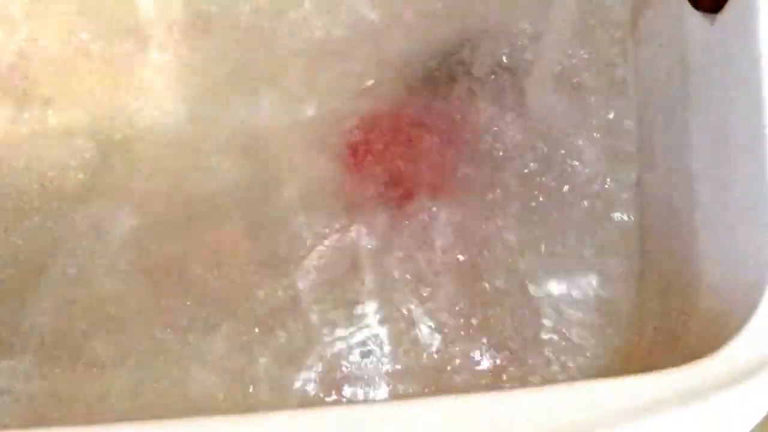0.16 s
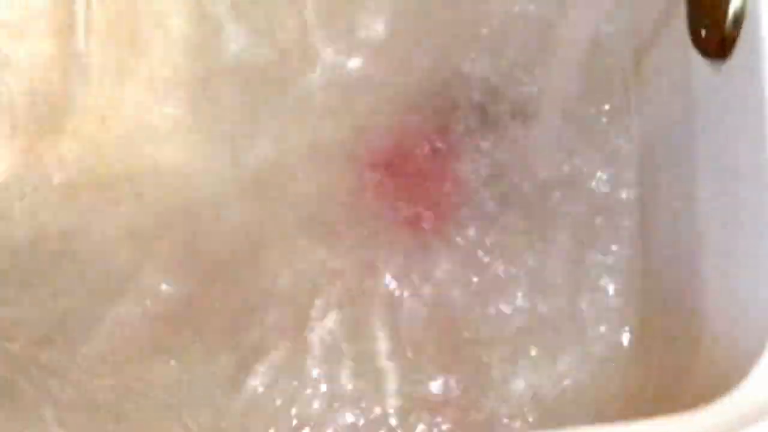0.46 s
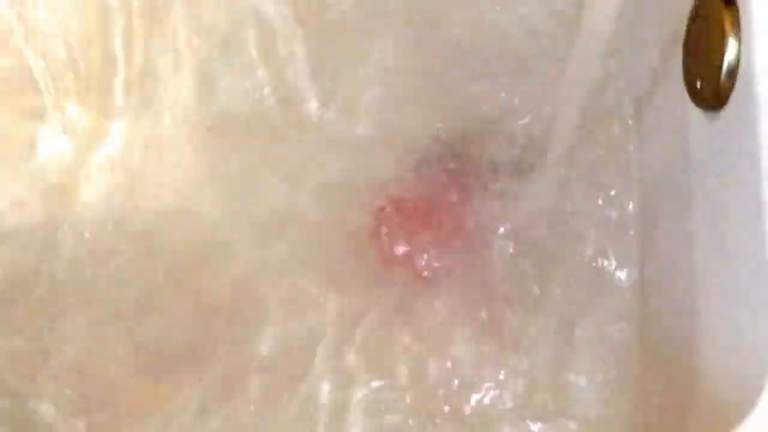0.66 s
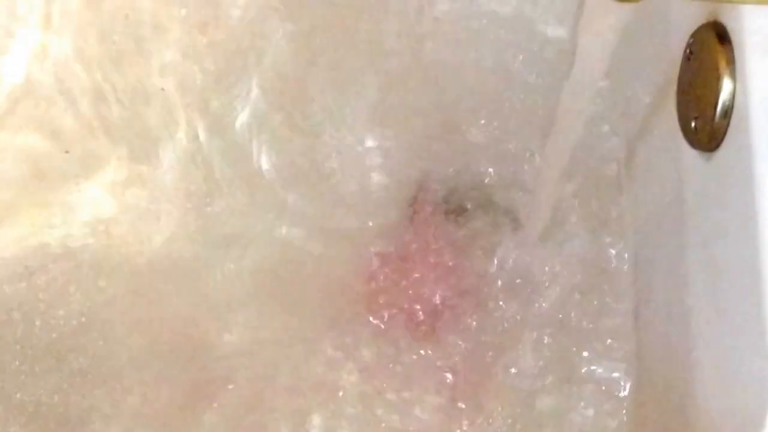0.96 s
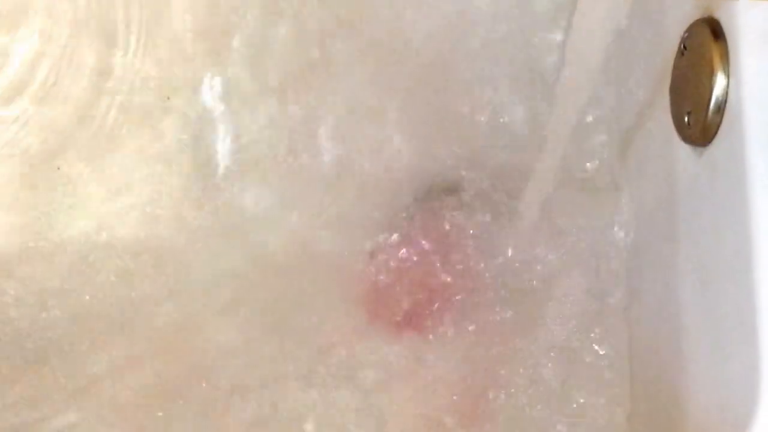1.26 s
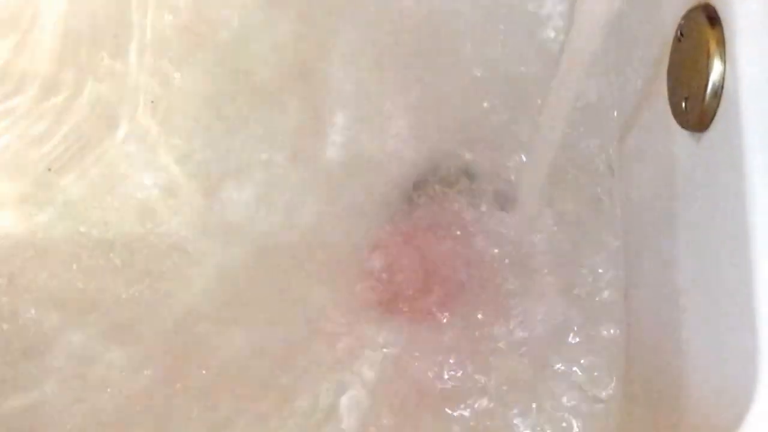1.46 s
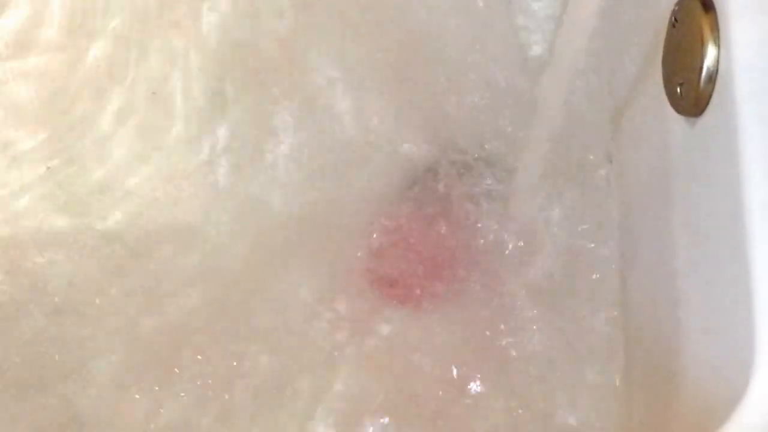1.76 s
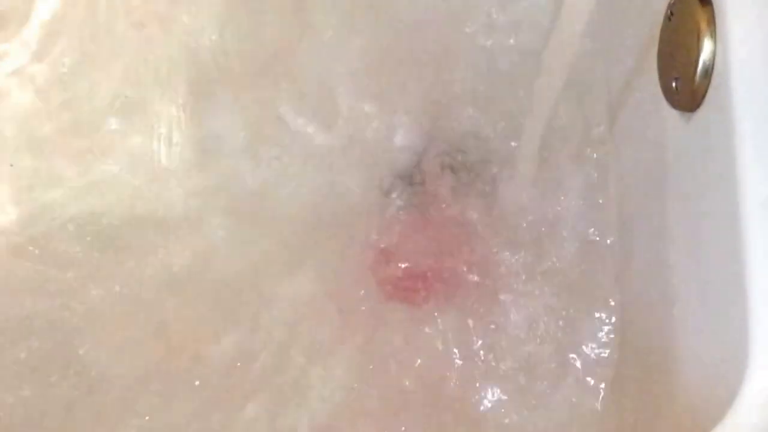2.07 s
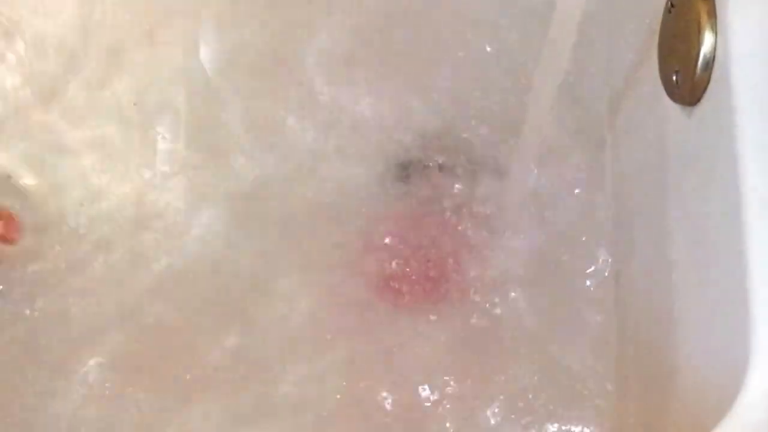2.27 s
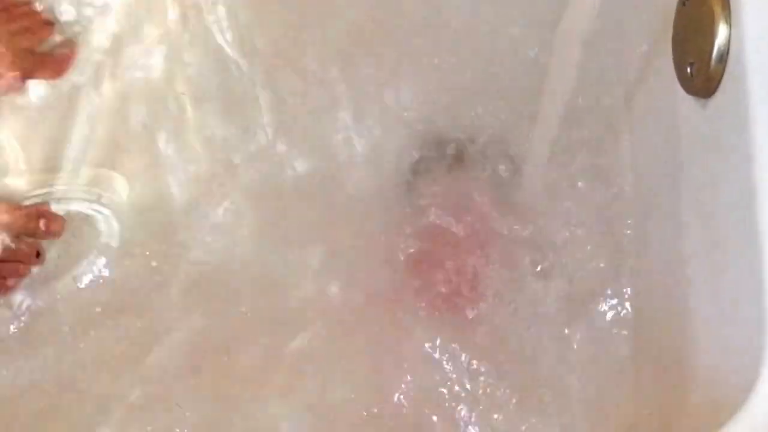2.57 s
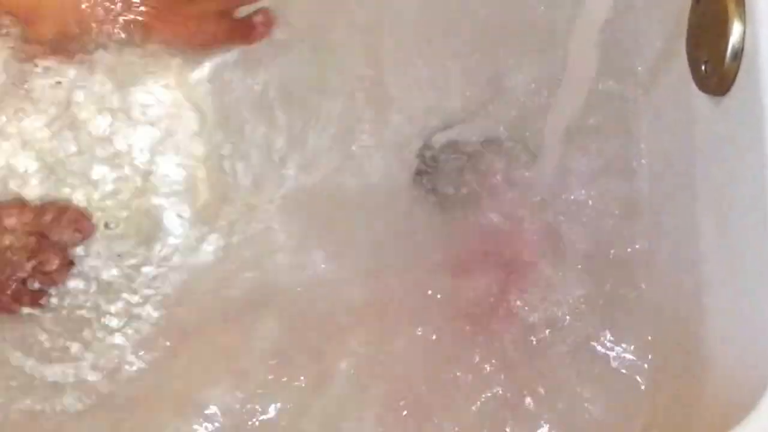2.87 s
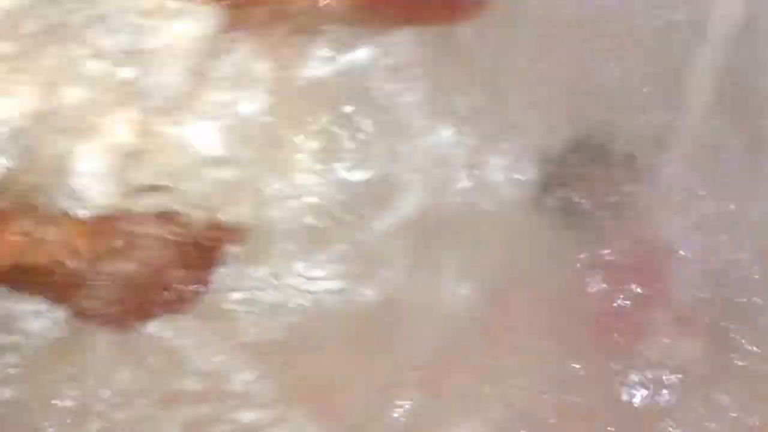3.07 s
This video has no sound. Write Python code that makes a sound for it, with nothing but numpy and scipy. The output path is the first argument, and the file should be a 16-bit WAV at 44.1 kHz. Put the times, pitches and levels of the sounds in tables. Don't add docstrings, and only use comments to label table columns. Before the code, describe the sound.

A tap pours into a filling bathtub throughout, about 3.2 seconds, close by in a small hard room. A resonant, churning rush carries bubbles that rise in pitch beneath hissing spray, fizz and small spits. It surges near 0.6 seconds, is thinner with fewer large bubbles around 0.9-1.3, then gurgles most strongly at 2.2-2.55 before easing. The stereo sound is hollow, combed and slightly shifting.

```python
import sys
import numpy as np
from scipy import signal
from scipy.fft import rfft, irfft, next_fast_len
from scipy.io import wavfile

SR = 44100
rng = np.random.default_rng(int(sys.argv[2]) if len(sys.argv) > 2 else 0)


def makeup_ratio(level_db):
    decades = np.asarray(level_db, float) / 20
    return 10 ** decades


def wav_out(sig):
    wavfile.write(sys.argv[1], SR, np.round(np.clip(np.atleast_2d(sig).T, -1, 1) * 32767).astype(np.int16))


N = 141561

# start in seconds, level in dB, extra spray in dB, spray fineness in dB per octave.
PLUNGE_FLOW = [(0.0, -22, 3.5, 0), (0.11, -27, -1.5, 4), (0.57, -21.5, 5.5, 3), (0.67, -29, 6, -1.5),
               (0.81, -25, -1, -2), (1.42, -25.5, -0.5, 2), (1.55, -23, 2.5, 0), (1.61, -31.5, -2, 1),
               (1.84, -25.5, -2.5, -2), (1.88, -28, -3, 2.5), (1.95, -23.5, -1, 0.5), (2.49, -21, 0, -1.5),
               (2.5, -22, -1, 1.5), (2.54, -19.5, -1.5, -2), (2.57, -25.5, 3.5, -2), (3.05, -26, 0, 3),
               (3.11, -32.5, 1.5, -1.5), (3.21, -27, -4, 2)]


def flow():
    starts, *columns = np.transpose(PLUNGE_FLOW)
    return [np.interp(np.arange(N) / SR, starts, column) for column in columns]


# frequency in Hz, level in dB per Hz.
ROAR_COLOUR = [(40, -23), (70, -8.5), (130, -0.5), (300, -1), (500, -4.5), (800, -8.5), (1700, -17),
               (2600, -24.5)]


def plunge_roar():
    roar_db = -1
    return makeup_ratio(roar_db) * patchy_noise(ROAR_COLOUR, shared_db=0.0, own_db=1.46, shared_rate=9.4, own_rate=26.5)


def bubble_swarm():
    bubble_db, bubbles_per_s = -3, 500
    swarm = grains(bubbles_per_s, low_hz=228, high_hz=2440, cycles=16.6,
                   spread_db=1.5, clump_db=3.0, spectrum=ROAR_COLOUR)
    return makeup_ratio(bubble_db) * swarm


# start in seconds, peak in dB, pitch in Hz.
LARGER_BUBBLES = [(0.104, -32, 774), (0.286, -12, 255), (0.384, -29, 760), (0.454, -50, 313),
                  (0.474, -14.5, 776), (0.514, -21, 445), (0.553, -11, 667), (0.577, -15, 292),
                  (0.619, -14.5, 1330), (0.758, -19, 755), (0.86, -22, 680), (1.32, -17, 664),
                  (1.463, -16, 890), (1.53, -11.5, 725), (1.554, -13, 363), (1.959, -17, 768),
                  (2.012, -16, 1070), (2.075, -12, 712), (2.209, -8, 678), (2.233, -6, 308),
                  (2.265, -8, 705), (2.299, -5.5, 694), (2.359, -11.5, 764), (2.439, -9, 1140),
                  (2.454, -12, 401), (2.501, -3.5, 738), (2.512, -10, 853), (2.515, -3.5, 327),
                  (2.528, -7.5, 930), (2.679, -27, 400), (2.797, -11.5, 289),
                  (0.386, -19.5, 1450), (0.4294, -34, 910), (0.6818, -21, 1070), (0.7026, -20, 1370),
                    (0.761, -28, 1240), (1.0503, -14, 1780), (1.2151, -29, 950), (1.388, -22, 1750),
                    (1.5725, -11.5, 1510), (1.6407, -28, 1340), (1.817, -24.5, 1210), (1.9454, -27, 1650),
                    (2.6604, -16.5, 1306), (2.7375, -11.5, 1590)]
# start in seconds, peak in dB, pitch in Hz.
SMALL_BUBBLES = [(0.234, -35, 3620), (0.38, -15, 4170), (0.4983, -39.5, 3460), (0.5307, -19, 3400),
                 (0.5816, -18, 3580), (0.622, -19, 4290), (0.643, -31, 3220), (0.7163, -25, 3260),
                 (0.833, -24, 3150), (1.057, -28, 3200), (1.3399, -18, 3430), (1.4626, -14, 3700),
                 (1.8652, -32, 3760), (1.9589, -31, 3220), (2.2026, -28, 3800), (2.366, -23.5, 4160),
                 (2.587, -27, 3110), (2.6409, -14, 3220), (2.7237, -22.5, 3600), (2.869, -20, 4100),
                 (2.8926, -22, 3980), (2.9726, -15, 3140), (3.061, -18.5, 3950)]


def single_bubbles():
    level_db, swell_cycles = -4.5, 2
    ring_cycles, pitch_rise = 39.4, 0.222
    out = np.zeros(N + SR)
    t = np.arange(SR // 8) / SR
    for start, db, hz in LARGER_BUBBLES + SMALL_BUBBLES:
        life = t * hz / ring_cycles
        swell = np.minimum(t * hz / swell_cycles, 1)
        decay = makeup_ratio(db + level_db - 60 * life ** 1.15)
        tone = np.sin(2 * np.pi * hz * t * (1 + pitch_rise * life))
        out[int(start * SR):][:len(t)] += decay * swell * tone
    return out[:N] * np.array([[1], [.6]])


# frequency in Hz, width in Hz, gain in dB.
TUB_MODES = [(76, 15, 7.5), (127.2, 8.3, 12), (182.2, 19, 9), (260.7, 20, 7), (326.3, 55.6, 8.5),
             (449, 29, 7.5), (600, 25, 0.5), (609.4, 35, 4), (766, 180, 7), (1033, 20, 7.5), (1320, 33, 8),
             (1450, 36, 8.5), (1593, 98, 7), (1810, 97, 13.5)]


def tub(hz):
    return makeup_ratio(sum(db / (1 + (2 * (hz - f) / width) ** 2) for f, width, db in TUB_MODES))


# frequency in Hz, level in dB per Hz.
SPRAY_COLOUR = [(1200, -17.5), (2200, 3), (3500, -2), (5000, -5), (7500, -7.5), (10000, -7.5),
                (12500, -14.5), (15000, -7)]


def spray_hiss():
    hiss_db = -7
    return makeup_ratio(hiss_db) * patchy_noise(SPRAY_COLOUR, shared_db=1.44, own_db=2.16, shared_rate=6.6, own_rate=17.7)


def fizz():
    fizz_db, bursts_per_s = -17.5, 2200
    bursts = grains(bursts_per_s, low_hz=2000, high_hz=14000, cycles=6.0,
                    spread_db=5.0, clump_db=3.5, spectrum=SPRAY_COLOUR)
    return makeup_ratio(fizz_db) * bursts


def droplets():
    droplet_db, droplets_per_s = -13.5, 260
    drops = grains(droplets_per_s, low_hz=1500, high_hz=9000, cycles=35.0,
                   spread_db=3.5, clump_db=4.0, spectrum=SPRAY_COLOUR)
    return makeup_ratio(droplet_db) * bathroom(drops)


def tilted(x, db):
    dull, below_top = (shaped(x, lambda hz: 1 / (1 + (hz / edge) ** 4)) for edge in (4200, 8500))
    middle, top = below_top - dull, x - below_top
    return dull * makeup_ratio(-db) + middle + top * makeup_ratio(db)


def spray_surface(flow_db, extra_db, fine_db):
    follows = 0.41
    level_db = flow_db.mean() + follows * (flow_db - flow_db.mean()) + extra_db
    return makeup_ratio(level_db) * tilted(spray_hiss() + fizz() + droplets(), fine_db)


# start in seconds, peak in dB, brightness 0-1.
SPRAY_SPITS = [(0.0688, -8.5, 0.64), (0.1501, -47, 0.9), (0.228, -18, 0.15), (0.317, -21, 0.6),
               (0.3693, -12, 0.54), (0.5796, -16.5, 0.96), (0.622, -25, 0), (0.6424, -24, 0.34),
               (0.715, -28, 0.1), (0.7606, -11, 0.68), (0.83, -15, 0.42), (0.9901, -17, 0.35),
               (1.2533, -12.5, 0.34), (1.341, -13, 0.66), (1.461, -15.5, 0.5), (1.569, -16, 0.73),
               (1.7356, -20.5, 1), (1.7925, -23, 0.36), (1.865, -18.5, 0.13), (1.957, -15, 0.45),
               (2.0457, -24, 0.6), (2.2018, -11, 0.17), (2.373, -13, 0.58), (2.5316, -8.5, 0.74),
               (2.587, -16, 0), (2.641, -25, 0), (2.8922, -13.5, 0.57), (2.974, -15, 0.5),
               (3.062, -17, 0.5), (3.1401, -17, 0.55)]
# start in seconds, peak in dB, brightness 0-1.
FINE_CRACKLES = [(0.014, -15.5, 1), (0.0687, -20.5, 0.8), (0.1501, -34, 0.9), (0.2269, -39, 0.77),
                 (0.266, -16, 0.8), (0.319, -22, 0.8), (0.3671, -27, 0.8), (0.4399, -49, 0.8),
                 (0.5814, -11, 0.93), (0.6215, -41, 0.8), (0.759, -24, 1), (0.84, -21.5, 1),
                 (0.9088, -48, 0.7), (0.9921, -50, 0.7), (1.044, -24.5, 0.7), (1.156, -16, 0.85),
                 (1.1842, -22, 1), (1.2511, -21.5, 1), (1.4062, -29, 0.9), (1.5753, -18, 0.77),
                 (1.737, -36, 0.95), (1.7923, -25, 0.8), (1.8647, -38, 0.7), (1.945, -25, 0.9),
                 (1.96, -30, 1), (2.0465, -27, 0.9), (2.0956, -27, 0.7), (2.138, -28, 0.7),
                 (2.2189, -19, 0.9), (2.3321, -30, 0.7), (2.376, -31, 0.8), (2.4603, -41, 0.64),
                 (2.529, -22, 1), (2.582, -31, 0.7), (2.608, -40, 0.8), (2.8933, -20.5, 0.7),
                 (2.9746, -25, 0.8), (3.1433, -34, 0.8)]
# frequency in Hz, level in dB per Hz.
SPIT_SPECTRUM = [(500, 4), (1200, -2), (2200, -1), (3500, 1.5), (6000, -4), (10000, -10), (12500, -10),
                 (15000, -15)]


def spits():
    spit_db, crackle_db, bright_db = -12.5, 3, -1.5
    attack_s, body_t60_s, crack_t60_s, crack_share = 0.0016, 0.1, 0.02, 0.77
    split_hz = 6000
    crackles = [(start, db + crackle_db, bright) for start, db, bright in FINE_CRACKLES]
    starts = np.zeros((2, N))
    for start, db, bright in SPRAY_SPITS + crackles:
        bright = np.clip(bright, 0, 1)
        starts[:, int(start * SR)] += makeup_ratio(db + spit_db) * np.array([1 - bright, bright * makeup_ratio(bright_db)])
    t = np.arange(SR // 5) / SR
    decay = makeup_ratio(-60 * t / body_t60_s) + crack_share * makeup_ratio(-60 * t / crack_t60_s)
    burst = np.minimum(t / attack_s, 1) * decay
    noise = patchy_noise(SPIT_SPECTRUM, shared_db=1.5, own_db=2.5, shared_rate=90.0, own_rate=40.0)
    dull = shaped(noise, lambda hz: 1 / (1 + (hz / split_hz) ** 4))
    dull_level, bright_level = (signal.fftconvolve(hits, burst)[:N] for hits in starts)
    return 2 * (dull_level * dull + bright_level * (noise - dull))


def bathroom(x):
    room_db, t60_s = -8, .12
    t = np.arange(SR // 3) / SR
    tail = rng.standard_normal((2, len(t))) * makeup_ratio(-60 * t / t60_s) * (t > .004)
    tail = tail / np.sqrt(np.sum(tail ** 2, axis=1, keepdims=True))
    return x + makeup_ratio(room_db) * signal.fftconvolve(x, tail, axes=1)[:, :N]


def patchy_noise(spectrum, shared_db, own_db, shared_rate, own_rate):
    out, together = 0, drift(shared_rate)
    edges = 35 * 2 ** np.arange(0, 9, .5)
    white = rng.standard_normal((2, 2, N))
    for k, (low, high) in enumerate(zip(edges, edges[1:])):
        if spectrum[0][0] / 1.5 < low < spectrum[-1][0] * 1.2:
            band_pass = signal.butter(2, [low, high], "band", fs=SR, output="sos")
            band = signal.sosfilt(band_pass, white[k % 2])
            out = out + band * makeup_ratio(shared_db * together + own_db * drift(own_rate))
    return rms_one(shaped(out, lambda hz: makeup_ratio(at_hz(spectrum, hz))))


def grains(per_s, low_hz, high_hz, cycles, spread_db, clump_db, spectrum):
    sizes = makeup_ratio(spread_db * np.minimum(rng.exponential(1, N), 5)) * rng.standard_normal((2, N))
    born = rng.random(N) < per_s * makeup_ratio(clump_db * drift(12)) / SR
    dealt, out = rng.integers(0, 30, N), 0
    for k, hz in enumerate(np.geomspace(low_hz, high_hz, 30)):
        r, w = makeup_ratio(-60 * hz / cycles / SR), 2 * np.pi * hz / SR
        clicks = sizes * born * (dealt == k) + 1e-18
        ring = signal.lfilter([0, np.sin(w)], [1, -2 * r * np.cos(w), r * r], clicks)
        out = out + hz ** .5 * makeup_ratio(at_hz(spectrum, hz)) * ring
    return rms_one(out)


def drift(rate):
    r = np.exp(-40 * np.pi * rate / SR)
    slow = signal.lfilter([1], [1, -2 * r, r * r], rng.standard_normal(N // 20 + 4002))[4000:]
    return np.interp(np.arange(N) / 20, np.arange(len(slow)), rms_one(slow))


def rms_one(x):
    return x / np.sqrt(np.mean(x ** 2) + 1e-20)


def at_hz(points, hz, axis=1):
    points = np.array(points)
    return np.interp(np.log(hz), np.log(points[:, 0]), points[:, axis])


def shaped(x, gain):
    size = next_fast_len(N + 4096)
    hz = np.maximum(np.fft.rfftfreq(size, 1 / SR), 1)
    return irfft(rfft(x, size) * gain(hz), size)[..., :N]


# frequency in Hz, differing over common field in dB, right port over left in dB.
PORT_BALANCE = [(40, -22, 5), (85, -27, 0.4), (180, -21.5, -0.5), (350, -15.5, 0.7), (690, -8.5, 2.5),
                (1480, -4, 7), (6200, -0.45, 4), (14000, -0.8, 5.5)]


def at_ports(common, differing):
    right_nearer_s = .00009
    differing = shaped(differing, lambda hz: makeup_ratio(at_hz(PORT_BALANCE, hz)))

    def port(sign):
        def gain(hz):
            level = makeup_ratio(sign * at_hz(PORT_BALANCE, hz, axis=2) / 2 - 5.0)
            return level * np.exp(sign * 1j * np.pi * hz * right_nearer_s)
        return shaped(common + sign * differing, gain)
    return np.array([port(-1), port(1)])


def scene():
    flow_db, extra_db, fine_db = flow()
    roar, swarm = plunge_roar(), bubble_swarm()
    surface = spray_surface(flow_db, extra_db, fine_db)
    echoing = makeup_ratio(flow_db - 4.0) * shaped(swarm, tub) + single_bubbles() + spits()
    common, differing = makeup_ratio(flow_db) * shaped(roar, tub) + surface + bathroom(echoing)
    return at_ports(common, differing)


# time in seconds, share 0-1.
PORT_CANCEL = [(0, .96), (.56, .96), (.62, .76), (1.05, .8), (1.2, .9), (1.55, .86), (1.75, .94),
               (2.2, .86), (2.4, .92), (2.65, .83), (2.9, .97), (3.21, .93)]


def cross_subtract(x):
    lag_s, lag_wander_s, share_wander = 0.000388, .0000035, .05

    def late(hz):
        return np.exp(-2j * np.pi * hz * lag_s)
    other = x[::-1]
    slope = shaped(other, lambda hz: 2j * np.pi * hz * late(hz))
    share = np.interp(np.arange(N) / SR, *np.transpose(PORT_CANCEL))
    share = np.minimum(share + share_wander * (drift(4.2) + 0.7 * drift(25.0)), 1)
    shift_s = lag_wander_s * (0.7 * drift(5.3) + 0.8 * drift(22.0))
    return x - share * (shaped(other, late) + shift_s * slope)


def top_flutter(x):
    flutter_db, strip_hz = 5.5, 330
    for low in np.arange(12400, 15700, strip_hz):
        band_pass = signal.butter(2, [low, low + strip_hz], "band", fs=SR, output="sos")
        strip = signal.sosfiltfilt(band_pass, x)
        x = x + strip * (makeup_ratio(flutter_db * drift(15.0)) - 1)
    return x


def band_limit(x):
    return signal.sosfilt(signal.butter(12, 16060, fs=SR, output="sos"), x)


def record(dry):
    low_cut_hz, high_cut_hz, ceiling = 73, 15750, .75
    x = top_flutter(cross_subtract(dry))
    x = signal.sosfilt(signal.butter(2, low_cut_hz, "high", fs=SR, output="sos"), x)
    x = ceiling * np.tanh(x / ceiling)
    x = signal.sosfilt(signal.cheby2(12, 60, high_cut_hz, fs=SR, output="sos"), x)
    return band_limit(x)


dry = scene()
out = record(dry)
wav_out(out)
```